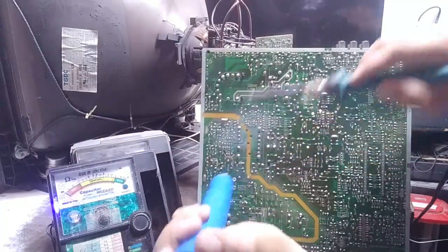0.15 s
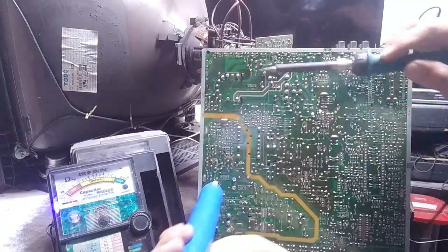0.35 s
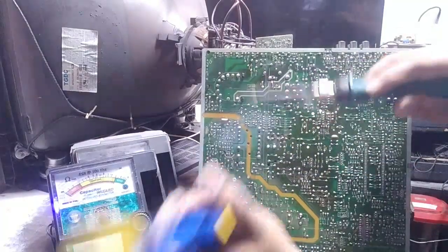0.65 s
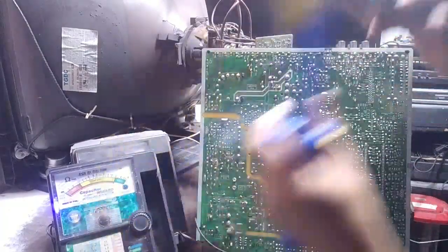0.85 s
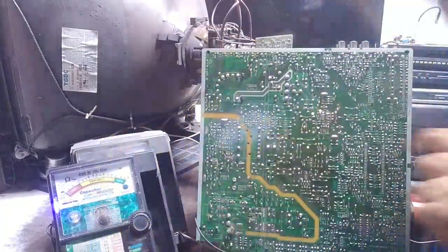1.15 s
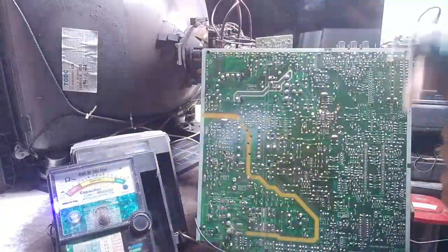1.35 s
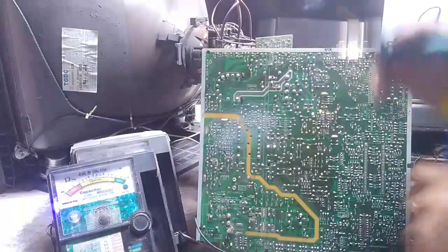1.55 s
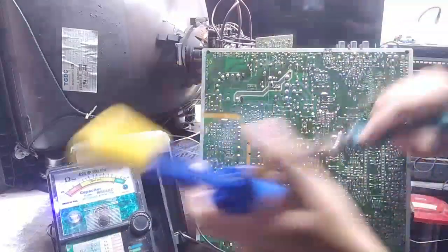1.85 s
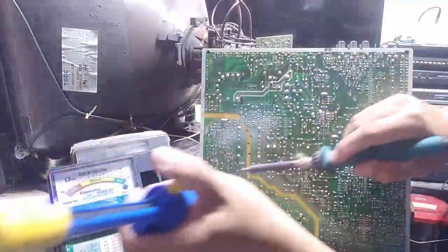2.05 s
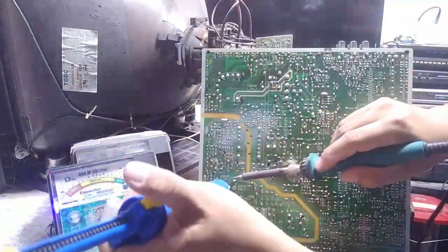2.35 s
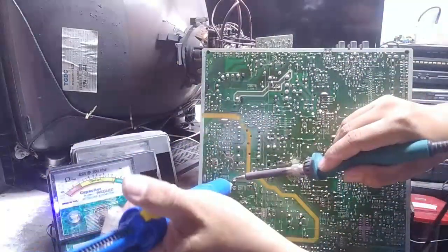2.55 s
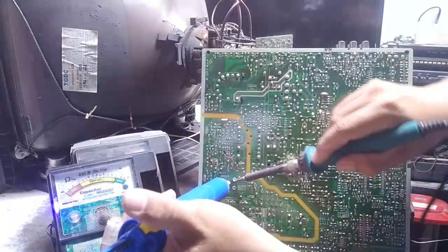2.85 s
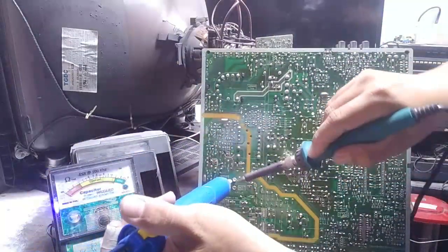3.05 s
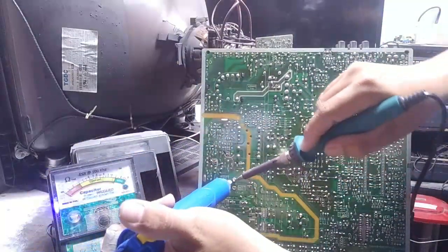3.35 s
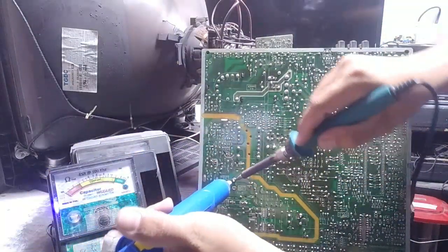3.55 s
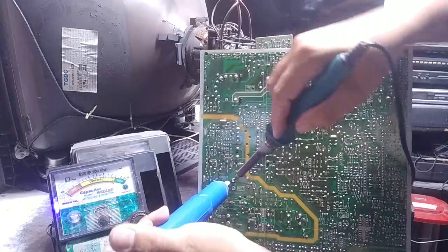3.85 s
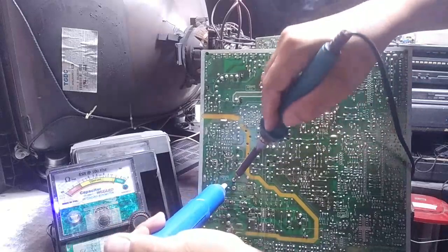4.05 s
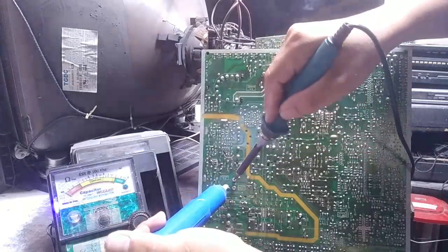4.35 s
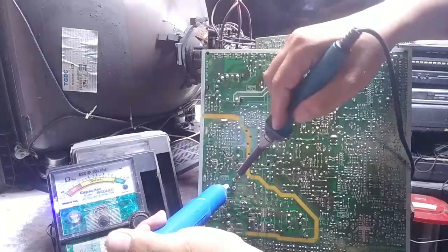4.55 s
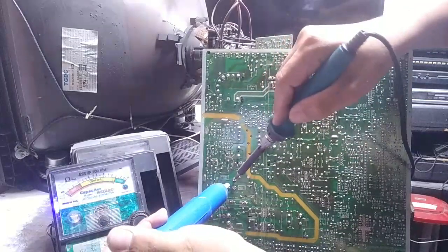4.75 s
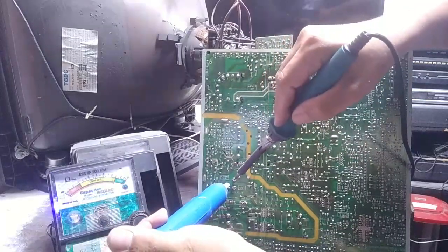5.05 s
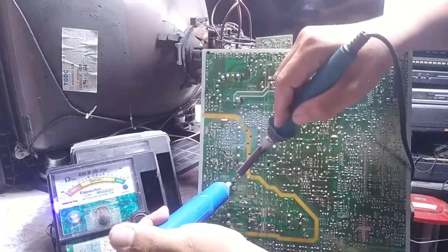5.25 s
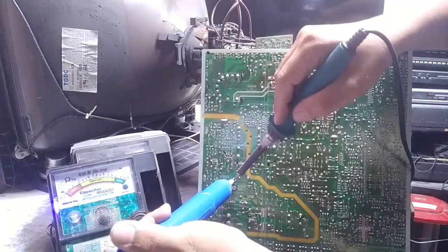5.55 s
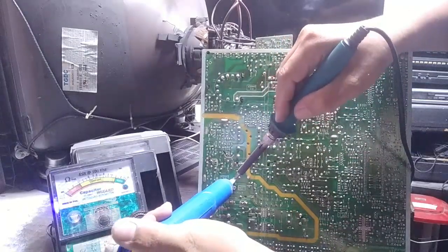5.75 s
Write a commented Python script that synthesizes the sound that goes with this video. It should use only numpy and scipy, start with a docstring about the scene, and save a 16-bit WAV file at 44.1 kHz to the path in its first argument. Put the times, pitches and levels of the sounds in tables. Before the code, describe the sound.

A spring-loaded solder pump snaps and scrapes up close, followed by scattered hollow taps over a low electrical hum.

```python
"""First comes a volley of sharp clicks: a spring-loaded solder pump snaps, close to the microphone,
over a workbench in a small room. A part lands on the wood and rattles, the plunger scrapes along
its barrel and latches, and hollow taps follow. Mains hum, buzz and room noise lie behind it all.
The camera's noise suppressor pulls the background down whenever nothing loud happens."""
import sys
import numpy as np
from scipy import signal
from scipy.fft import rfft, irfft, next_fast_len
from scipy.io import wavfile
from scipy.ndimage import uniform_filter1d, map_coordinates

SR = 44100
rng = np.random.default_rng(int(sys.argv[2]) if len(sys.argv) > 2 else 0)


def wav_record(signal):
    """Record a signal, one row per channel, as 16-bit PCM in the file named by sys.argv[1]."""
    frames = np.transpose(np.atleast_2d(signal))
    bounded = np.clip(frames, -1, 1)
    # unit amplitude maps onto the largest positive 16-bit level
    quanta = np.round(bounded * 32767).astype(np.int16)
    wavfile.write(sys.argv[1], SR, quanta)


N = 260631


def amp(db):
    return 10 ** (np.asarray(db) / 20)


def unit_rms(x):
    return x / np.sqrt(np.mean(x ** 2) + 1e-20)


def at_peak(x, db):
    return x * amp(db) / np.abs(x).max()


def add(out, start_s, x):
    out[round(start_s * SR):][:len(x)] += x


def along(points, hz):
    """Interpolates (Hz, value) points on a log frequency axis."""
    freqs, values = np.transpose(points)
    return np.interp(np.log(hz + 1), np.log(freqs + 1), values)


def filtered(x, response):
    """x through a complex frequency response."""
    size = next_fast_len(len(x) + 8192)
    return irfft(rfft(x, size) * response(np.fft.rfftfreq(size, 1 / SR)), size)[:len(x)]


def shaped(x, points):
    return filtered(x, lambda hz: amp(along(points, hz)))


def ringing(x, modes):
    """x through resonances of alternating sign: (centre [Hz], width [Hz], gain [dB])."""
    return filtered(x, lambda f: sum((-1) ** k * amp(db) * 1j * f * w / (c * c - f * f + 1j * f * w)
                                     for k, (c, w, db) in enumerate(modes)))


def ringing_twice(x, modes):
    """Two passes: steeper skirts, gains in dB doubled."""
    return ringing(ringing(x, modes), modes)


def wobble(rate):
    """A smooth random curve, rate knots a second."""
    return map_coordinates(rng.standard_normal(int(N * rate / SR) + 4), [np.arange(N) * rate / SR])


def burst(t60):
    """A dying puff of contact noise."""
    t = np.arange(SR // 3) / SR
    return rng.standard_normal(len(t)) * amp(-60 * t / max(t60, .002)) * (1 - np.exp(-t / .00046))


# Decay of the small room: (frequency [Hz], t60 [s])
ROOM_DECAY = [(200, 0.1), (1500, 0.14), (4000, 0.1), (8000, 0.11), (14000, 0.093)]
def room(x, wet_db):
    """Direct sound at the microphone, then a tail in which each frequency dies at its own speed."""
    hz, t, spectrum = signal.stft(rng.standard_normal(SR // 3), SR, nperseg=256)
    decay = amp(-60 * t / along(ROOM_DECAY, hz)[:, None])
    tail = signal.istft(spectrum * decay, SR, nperseg=256)[1]
    late = signal.fftconvolve(np.pad(x, (200, 0)), tail / np.linalg.norm(tail))[:len(x)]
    return x + amp(wet_db) * late


# Spectrum of the room noise: (frequency [Hz], relative level [dB])
AIR_SPECTRUM = [(15, -21), (32, -11.5), (55, 4), (90, -6.5), (150, -6), (300, -8), (600, -13), (1100, -10),
                (1500, -12), (2400, -17), (3500, -27.5), (5600, -28.5), (12000, -26.5), (15600, -37)]
def room_tone():
    """Low, gently uneven noise all around the microphone."""
    level = amp(-58 + .62 * wobble(.93) + 1.1 * wobble(18))
    return level * unit_rms(shaped(rng.standard_normal(N), AIR_SPECTRUM))


MAINS_HZ, SPIKE_PHASE_CYCLES = 59.87, .67
# Hum tones, played from the second row on: (multiple of mains, relative level [dB])
HUM_TONES = [(1, -7), (2, 2.5), (3, -11.5), (4, -18.5), (5, -15), (6, -4.5), (7, -18), (8, -28.5),
             (9, -16.5), (10, -38), (11, -17.5), (12, -29.5), (13, -19.5), (14, -18.5), (15, -29),
             (16, -17.5), (17, -27), (18, -10), (19, -30), (20, -19.5), (21, -33), (22, -21.5)]
def mains():
    """Hum and buzz fill the room: the tones dip together at a contact spike, one each half cycle."""
    cycles = MAINS_HZ * np.arange(N) / SR - SPIKE_PHASE_CYCLES
    hum = np.zeros(N)
    for k, db in HUM_TONES[1:]:
        level = amp(db + .8 * wobble(5.3))
        hum -= level * np.cos(2 * np.pi * k * cycles + .22 * k + .2 * wobble(2.4) * np.sqrt(k))
    return amp(-51.5) * hum + amp(-70) * buzz(cycles)


# Spectrum of the buzz: (frequency [Hz], relative level [dB])
BUZZ_SPECTRUM = [(500, -27.5), (1500, -0.5), (4000, 7), (9000, -1.5), (15000, -6)]
def buzz(cycles):
    """The two half cycles spike unequally, with noise that is much alike each cycle."""
    strong, weak = (np.exp(-(((cycles + half + .5) % 1 - .5) / .028) ** 2) for half in (0, .5))
    period = round(SR / MAINS_HZ)
    repeating = rng.standard_normal(period)[(cycles % 1 * period).astype(int) % period]
    envelope = (strong + amp(-4.5) * weak) * amp(1.2 * wobble(40))
    spikes = envelope * (repeating + .7 * rng.standard_normal(N))
    return unit_rms(shaped(spikes, BUZZ_SPECTRUM))


# Course of the lowest hum tone: (time [s], level [dB])
FUNDAMENTAL_LEVELS = [(0, -36), (.1, -67.5), (.85, -66), (1.22, -63), (1.31, -46.5), (1.58, -41),
                      (1.76, -49.5), (1.91, -64), (2.86, -59.5), (3.15, -65), (3.55, -56.5), (4.1, -58),
                      (4.76, -58.5), (4.95, -55.5), (5.2, -60.5), (5.91, -61.5)]
def mains_fundamental():
    """The unsteady lowest tone, which swells at times, most of all around 1.3 to 1.8 s."""
    t = np.arange(N) / SR
    level_db = np.interp(t, *np.transpose(FUNDAMENTAL_LEVELS)) + 1.2 * wobble(12) + 1.8 * wobble(8)
    phase = 2 * np.pi * (MAINS_HZ * t - SPIKE_PHASE_CYCLES) + np.pi + .35 * wobble(12)
    return np.sqrt(2) * amp(level_db) * np.sin(phase)


# Soft jolts of the bench: (time [s], level [dB], frequency [Hz], t60 [s])
JOLTS = [(.003, -21.5, 130, 0.087), (1.31, -43.5, 160, 0.19), (1.451, -35.5, 95, .15),
         (1.555, -35, 29.84, 0.26)]
def bench_jolts():
    """The bench swings under the microphone, one low dying tone a jolt."""
    out, t = np.zeros(N + SR), np.arange(SR // 3) / SR
    for start, db, hz, t60 in JOLTS:
        envelope = amp(db - 60 * t / t60) * (1 - np.exp(-t / .004))
        add(out, start, envelope * np.sin(2 * np.pi * hz * t))
    return out[:N]


# Resonances of the bench top: (centre [Hz], width [Hz], gain [dB])
BENCH_MODES = [(280, 65, -6.5), (515.2, 57, -2.5), (680, 100, -1.5), (942, 130, -1.5), (1333, 110, -3),
               (1456, 160, 0), (1720, 350, -1)]
def bench_wood(x):
    """The bench rings but radiates little deep bass or treble."""
    ring = ringing(x, BENCH_MODES)
    return ringing(ringing(ring, [(680, 1800, 0)]), [(900, 12000, 0)])


# Resonances of the falling part's edge: (centre [Hz], width [Hz], gain per pass [dB])
RIM_MODES = [(2760, 940, 18), (5500, 7700, -32)]
def dropped_part(land_s=.4485, land_db=-15, gap_s=.012, settle_s=.015, rim_loss_db=9):
    """A part lands on the bench nearby and bounces to rest, ever softer and duller."""
    out = np.zeros(N + SR)
    delays = gap_s * (np.arange(7) + np.append(0, rng.uniform(-.3, .3, size=6)))
    corner = (land_s - .004, land_db - 12.5)  # a corner touches first
    bounces = [(land_s + delay, land_db - (delay / settle_s) ** 2) for delay in delays]
    for k, (start, db) in enumerate([corner] + bounces):
        contact = burst(t60=.024)
        rim = at_peak(ringing_twice(contact, RIM_MODES), db - .5 - rim_loss_db * k)
        add(out, start, room(at_peak(bench_wood(contact), db) + rim, wet_db=-2))
    return out[:N]


def tap_contact(length_s):
    """A blow, then chatter that stops."""
    t = np.arange(SR // 3) / SR
    blow = np.exp(-((t - .0002) / .00005) ** 2)
    envelope = np.exp(-(t / length_s) ** 2.8) * (1 - np.exp(-t / .0016))
    return 2.1 * blow + rng.standard_normal(len(t)) * envelope


# Resonances of the contact's own crack: (centre [Hz], width [Hz], gain [dB])
CRACK_MODES = [(850, 1200, 0.5), (4715, 5500, 1), (9800, 5500, 0.5)]
# Resonances of a deep and a small hollow body: (multiple of the lowest, width / centre, gain [dB])
DEEP_BODY = [(1, .32, 0), (1.62, .28, 0), (3.8, .26, -26)]
SMALL_BODY = [(1, 0.15, 5.5), (1.49, .14, 2.5), (2.13, 0.17, -6), (2.5, 0.19, -10.5)]
# Taps on each: (time [s], peak [dB], lowest resonance [Hz], upper resonances' boost [dB],
# crack relative to peak [dB])
DEEP_TAPS = [(2.3185, -34, 833, -1, -14), (2.7225, -35, 850, -1, -33), (3.1855, -23.5, 854, -2.5, -15.5),
             (3.4285, -19.5, 850, 1.5, -9.5)]
SMALL_TAPS = [(.1435, -19.5, 1413, 4, -23), (2.612, -46.5, 960, 9.4, -15), (3.8807, -17, 1857, 17, -8),
              (4.059, -49, 1050, 12, -18.5), (4.083, -54, 1020, 9, -16), (4.152, -53, 942, 8, -18),
              (4.8203, -15.5, 1800, 1.5, -17), (5.85, -49, 1056, 10.4, -18)]
def hollow_taps(taps, body, length_cycles):
    """Each tap rings a hollow body at its own pitch; its weak crack carries more of the room."""
    out = np.zeros(N + SR)
    for start, db, hz, upper_db, crack_db in taps:
        modes = [(ratio * hz, width * ratio * hz, (gain + upper_db * (k > 0)) / 2)
                 for k, (ratio, width, gain) in enumerate(body)]
        hollow = at_peak(ringing_twice(tap_contact(length_cycles / hz), modes), db)
        tilt_db = 3.34 * np.log2(hz / 2000)  # lower taps crack duller
        crack_modes = [(centre, width, gain + tilt_db * np.log2(centre / 4000))
                       for centre, width, gain in CRACK_MODES]
        crack = at_peak(ringing(tap_contact(length_cycles / hz), crack_modes), db + crack_db)
        add(out, start, room(hollow, wet_db=-8.5) + room(crack, wet_db=-2.5))
    return out[:N]


def seal_friction(modes):
    """Dense slips of the seal excite the barrel."""
    slips = rng.standard_normal(N) * amp(1.9 * wobble(500) + 4.2 * wobble(60))
    return unit_rms(ringing_twice(slips, modes))


# Resonances of the rubbed barrel: (centre [Hz], width [Hz], gain per pass [dB])
SCRAPE_MODES = [(3000, 1500, -3.5), (5200, 1700, 0), (6960, 2000, -1), (10500, 3900, -7.5)]
SQUEAK_MODES = [(2660, 970, -1)]
# Plunger strokes: (start [s], fastest [s], stop [s], level at fastest [dB], level at stop [dB])
STROKES = [(-.1, .01, 0.11, -20.5, -46), (0.744, .78, 0.86, -70, -70), (1.26, 1.273, 1.39, -44, -48.5),
           (1.385, 1.449, 1.54, -34.5, -55.5), (1.554, 1.562, 1.595, -45.5, -54.5),
           (1.61, 1.635, 1.707, -32.5, -37), (1.74, 1.79, 1.9, -59.5, -82)]
def plunger_slide(fade_s=.015):
    """The plunger scrapes close to the microphone; its seal squeaks more as a stroke goes on."""
    t, out = np.arange(N) / SR, np.zeros(N)
    scrape, squeak = seal_friction(SCRAPE_MODES), seal_friction(SQUEAK_MODES)
    for start, fastest, stop, db, stop_db in STROKES:
        level = amp(np.interp(t, [start, fastest, stop], [db - 14, db, stop_db]))
        fade = np.clip(np.minimum(t - start, stop - t) / fade_s + 1, 0, 1) ** 2
        squeak_gain = amp(np.interp(t, [start, stop], [-12, -1]))
        out += level * fade * (scrape + squeak_gain * squeak)
    return room(out, wet_db=-5.5)


# Resonances of the struck barrel: (centre [Hz], width [Hz], gain [dB])
BARREL_MODES = [(2000, 950, -6.5), (2710, 910, -2.5), (3535, 390, -0.5), (5130, 810, 0.5), (8240, 1200, -7),
                (10100, 930, -12.5), (13000, 1100, -18)]
# Plunger and latch clicks: (time [s], peak [dB], thud relative to peak [dB], tilt [dB/octave])
CLICKS = [(.001, -6, 1, -2), (.008, -8.5, -3.5, -1), (0.0149, -5, -10.5, -7.5), (.023, -5, -6.5, -5),
          (.033, -13.5, 1, -1), (0.055, -13.5, -6, -3.5), (0.1094, -11, -17.5, 4.5),
          (0.1509, -9, -25, -9.5), (1.31, -14.5, -4.5, -6), (1.318, -16, -7.5, 0.5),
          (1.441, -14.5, -29.5, -0.5), (1.45, -3.5, -26.5, 0), (1.454, -3.5, -13.5, -1),
          (1.464, -11.5, -10.5, -2), (1.5608, -3, -16.5, -0.5), (1.602, -23.5, -20, 1),
          (1.616, -24, -25, 6.5), (1.632, -21.5, -19.5, 1)]
def pump_clicks():
    """Close up, each click rings the barrel and thuds into the bench; harder ones are shorter."""
    out = np.zeros(N + SR)
    for start, db, thud_db, tilt_db in CLICKS:
        barrel = [(hz, width, gain + tilt_db * np.log2(hz / 4000) + rng.normal(0, 3))
                  for hz, width, gain in BARREL_MODES]
        contact = burst(t60=.006 * 2 ** (-db / 7.5))
        ring = at_peak(ringing(contact, barrel), db)
        thud = at_peak(bench_wood(burst(t60=.012)), db + thud_db)
        add(out, start, room(ring + thud, wet_db=-7.5))
    return out[:N]


def scene():
    """All that reaches the one microphone at the bench."""
    hits = pump_clicks() + dropped_part() + bench_jolts()
    hits += hollow_taps(DEEP_TAPS, DEEP_BODY, length_cycles=14.7)
    hits += hollow_taps(SMALL_TAPS, SMALL_BODY, length_cycles=12.7)
    return (hits + plunger_slide() + mains() + mains_fundamental() + room_tone())[None]


def held(drive, fall_per_s):
    """Follows rises at once and sinks at a steady rate."""
    ramp = fall_per_s * np.arange(N) / SR
    return np.maximum.accumulate(drive + ramp) - ramp


def record(dry, cutoff_hz=15750):
    """The suppressor opens on loud sound: the treble closes again soon, the whole level sinks slowly."""
    x = dry[0]
    sidechain = filtered(x, lambda hz: np.clip(hz / 700 - 1, 0, 1))
    level_db = 10 * np.log10(np.abs(uniform_filter1d(sidechain ** 2, size=441)) + 1e-12)
    drive = np.clip((level_db + 50) / 14, 0, 1)  # rises from -50 to -36 dB
    level_open = uniform_filter1d(held(drive, fall_per_s=1), size=441)
    treble_open = np.clip(held(2.5 * drive, fall_per_s=30), 0, 1)
    treble = filtered(x, lambda hz: np.clip(hz / 3000 - 1, 0, 1))
    x = x + treble * (amp(-8 * (1 - treble_open)) - 1)
    x = x * amp(-6.5 * (1 - level_open))
    return filtered(x, lambda hz: np.clip((cutoff_hz - hz) / 500 + .5, 0, 1) ** 2)[None]


dry = scene()
out = record(dry)
wav_record(out)
```